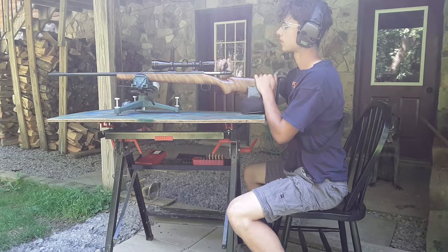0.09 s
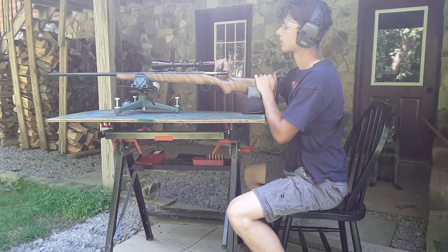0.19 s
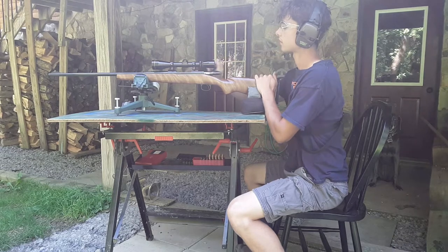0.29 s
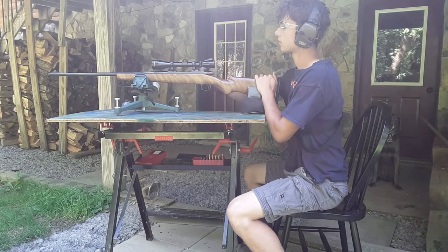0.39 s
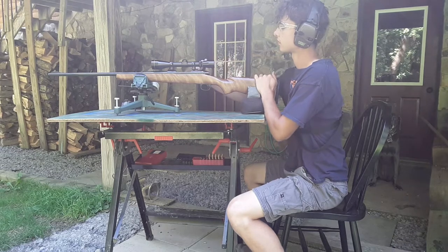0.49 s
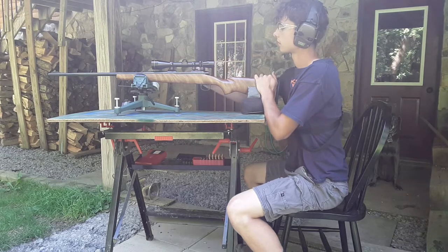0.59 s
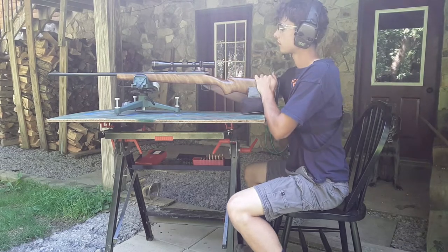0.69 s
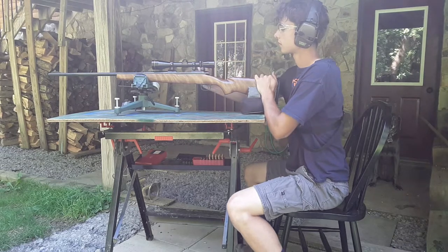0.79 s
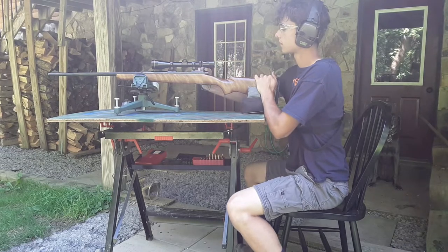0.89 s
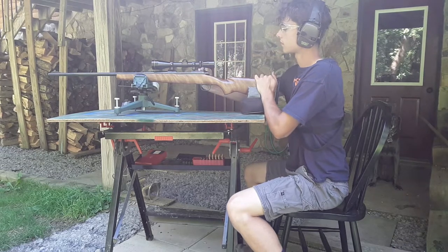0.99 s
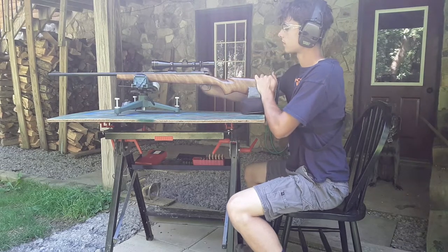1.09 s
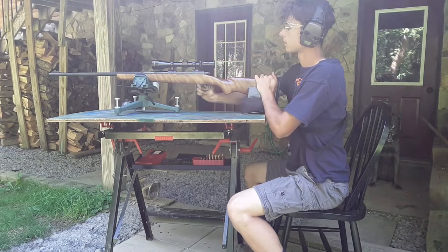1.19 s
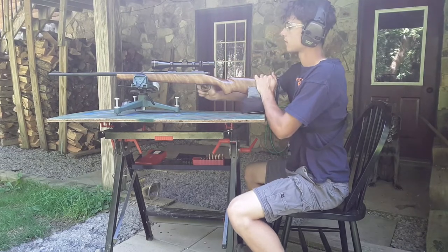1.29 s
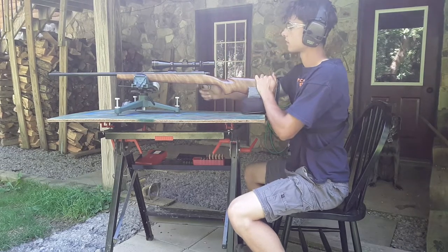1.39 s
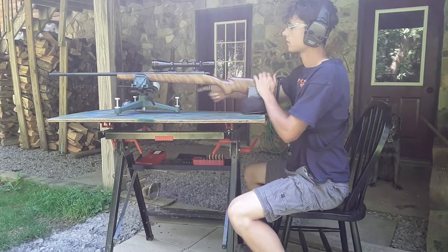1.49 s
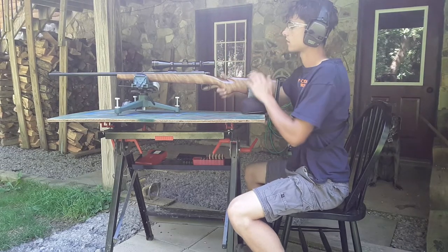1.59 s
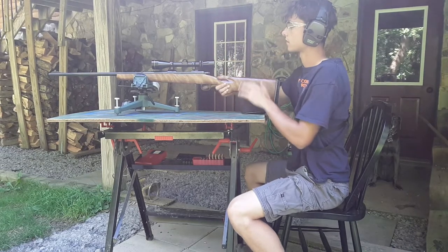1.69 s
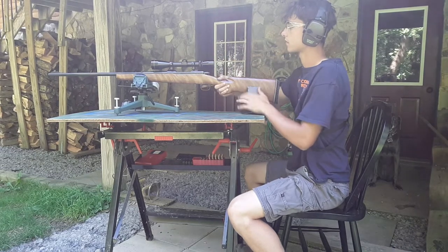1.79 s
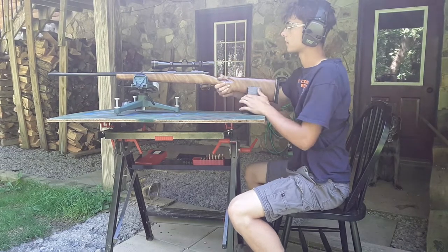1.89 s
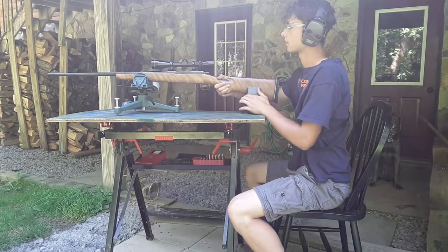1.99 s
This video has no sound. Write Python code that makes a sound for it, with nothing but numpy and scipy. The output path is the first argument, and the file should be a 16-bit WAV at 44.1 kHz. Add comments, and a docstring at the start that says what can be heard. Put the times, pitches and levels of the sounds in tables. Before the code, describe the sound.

A rifle bolt is worked close up: light steel clicks from 0.1 s, sharper ones at 0.2-0.27 s over a faint gritty slide, then a hard clack at 0.45 s. A light wooden tap follows at 0.6 s, then near quiet. Tiny ticks at 1.07-1.11 s lead to a loud snap shut at 1.15 s. Faint bumps follow; short stone-porch echo, soft outdoor hiss, low rumble.

```python
"""A rifle's bolt is worked at a shooting bench under an open stone porch: steel slides and clicks,
clacks against its stop, and after a few small ticks the action snaps shut.
Each contact is a noise burst exciting damped modes; sliding is randomly modulated noise, heard with dull bumps.
Decaying noise forms the brief porch echo and a faint yard tail.
Behind lie a soft high hiss, a low outdoor rumble and a faint far hum."""
import sys
import numpy as np
from scipy import signal
from scipy.fft import rfft, irfft
from scipy.io import wavfile
from scipy.ndimage import uniform_filter1d

SR = 44100
rng = np.random.default_rng(int(sys.argv[2]) if len(sys.argv) > 2 else 0)


def master(y):
    """Save y as 16-bit WAV."""
    cut = np.clip(np.atleast_2d(y).T, -1, 1)
    pcm = np.round(cut * 32767)  # scale
    wavfile.write(sys.argv[1], SR, pcm.astype(np.int16))


N = 88200
TIME = np.arange(N) / SR  # s
HZ = np.maximum(np.fft.rfftfreq(2 * N, 1 / SR), 1)
SIDES = np.array([[1], [-1]])  # left, right

# Contacts: start_s, level_db (before the part's gain), bass_db, treble_db, decay_ms, ring_hz
# light contacts of the bolt
CLICK_CONTACTS = [(.0945, -25, -2, -24, 1.9, 6430), (.1805, -14.5, 1, -31, 5.6, 5450),
                  (.2132, -5, -34, 4.5, 2.2, 5120), (.2172, -12.5, 0, 8, 5.2, 7440),
                  (.2662, -9.5, -3, 1, 2.6, 7700), (.2712, -10.5, -3, -2, 13, 5450),
                  (.3815, -28, 8, 4.5, 6.5, 6440), (.391, -27, 16.5, 0.5, 3.7, 10700),
                  (.4338, -12.5, -4.5, 2, 0.85, 6700), (.4422, -18, 9, -1, 1.3, 1670),
                  (.7824, -30.5, -5, -16, 3, 4280), (1.069, -29, -10, 9.5, 0.98, 8400),
                  (1.1003, -26.5, -3, 7, 2.1, 7220), (1.1138, -25.5, 9.5, -3, 2.3, 2920)]
# the bolt grazes its stop, hits it and rebounds
STOP_CONTACTS = [(.4501, -14.5, 2.5, -5, 1.08, 5370), (.4516, -6.5, 0, 0, 1.42, 6680),
                 (.4562, -19.5, -10, -6, 1, 6800)]
# the action snaps shut
SNAP_CONTACTS = [(1.1486, 0, 0.5, -3, 1.48, 740)]
# light knocks on the wooden stock
TAP_CONTACTS = [(.5958, -23, -1.5, -5, 2, 1380), (1.4545, -35.5, 0.5, -29, 1.3, 2220),
                (1.6425, -34.5, -7, 7, 3.5, 2590)]

# Broad spectrum of each struck part: frequency_hz, level_db (relative)
CLICK_SPECTRUM = [(250, -16.5), (650, -13), (1300, -5.5), (3000, -1.5), (5300, -1.5), (7800, -4.5),
                  (9000, -11.5), (11500, -16), (15500, -27.5)]
STOP_SPECTRUM = [(180, -15.5), (550, -26), (780, -2.5), (1150, -7), (1500, -5), (2600, 0), (4000, -0.5),
                 (6700, -3.5), (8300, -8), (12000, -16.5), (15500, -24)]
SNAP_SPECTRUM = [(170, -15), (290, -24.5), (470, -11.5), (640, -4), (820, 0.5), (1000, -11.5), (1250, -3),
                 (1850, 1.5), (2550, -10), (3100, -3.5), (5500, -3.5), (7000, -0.5), (8200, -6.5),
                 (12000, -13.5), (15500, -28)]
TAP_SPECTRUM = [(300, -8.5), (950, -8.5), (1350, -4), (2400, -4.5), (4500, -2), (7000, -6), (15000, -38)]

# Vibration modes of each part: frequency_hz, level_db (above the broad spectrum), t60_s
CLICK_RESONANCES = [(4590, 8, 0.04), (6900, 9.5, 0.023), (10980, 12, 0.025)]
STOP_RESONANCES = [(855, 4, 0.076), (1216, 5.3, 0.016), (1790, 9.7, 0.077), (3756, 5, 0.013),
                   (5240, 2.2, 0.03), (6840, 2.6, 0.032)]
SNAP_RESONANCES = [(666, 2.8, 0.052), (1210, 3.7, 0.024), (1290, 2.3, 0.056), (1730, 0.92, 0.027),
                   (1808, 4.2, 0.047), (2990, 8.4, 0.014), (4230, 3.5, 0.16), (5500, 3.6, 0.033),
                   (6450, 7.7, 0.006)]
TAP_RESONANCES = [(1890, 9.4, 0.01), (3280, 9, 0.0093)]
SLIDE_RESONANCES = [(1710, 12, 0.02), (3563, 8.2, 0.031)]

# Friction of the sliding bolt: time_s, level_db (before roughness, pan and resonance)
SLIDE_LEVEL = [(.085, -52), (.1, -46), (.17, -54.5), (.3, -44.5), (.36, -49.5), (.46, -44), (.62, -61),
               (.72, -61)]
# Friction spectrum: frequency_hz, level_db (relative)
SLIDE_SPECTRUM = [(200, -2), (700, -2), (1700, -3), (2600, 2.5), (3600, 6), (6500, 2), (9000, -35),
                  (15000, -64)]

# Hands shift the rifle on its rest: start_s, level_db, decay_s
REST_BUMPS = [(0.098, -44.5, 0.085), (.235, -57, 0.029), (0.454, -49, 0.09), (1.379, -50.5, 0.027),
              (1.618, -59, 0.022)]
# Bump spectrum: frequency_hz, level_db (relative)
BUMP_SPECTRUM = [(25, -11.5), (65, -3), (150, -2.5), (230, -5.5), (350, -40), (4000, -82)]

# Colour of the porch echo: frequency_hz, gain_db
ECHO_COLOUR = [(150, 6.5), (700, 1), (2500, 0), (15000, 3.5)]
# Left-right balance of the rifle: frequency_hz, left_minus_right_db
RIFLE_PAN = [(700, 0), (1100, -6.5), (2200, 5.5), (5000, 9.5), (8000, 12.5), (13000, 9.5)]
# Left-right likeness of rifle and echo: frequency_hz, correlation (limited to 0.98 either way)
RIFLE_LIKENESS = [(700, 0.88), (1500, 0.59), (3000, -0.23), (12000, -0.046)]

# Outdoor hiss spectrum: frequency_hz, level_db (relative)
HISS_SPECTRUM = [(100, -17), (300, -4), (520, -8.5), (950, -12), (1400, -10), (2000, -3.5), (4300, -3.5),
                 (6620, 0.5), (8500, -9.5), (12700, -19), (16000, -34)]
# Outdoor hiss level: time_s, level_db (before pan)
HISS_LEVEL = [(0, -51.5), (.7, -52.5), (1.0, -54), (1.4, -53.5), (1.7, -57), (2, -57.5)]
# Low rumble spectrum: frequency_hz, level_db (relative)
RUMBLE_SPECTRUM = [(20, -39), (42, 3), (75, 2), (150, -6), (260, -25), (700, -40), (3000, -80)]
# Far hum level: time_s, level_db (peak)
HUM_LEVEL = [(.6, -65), (.72, -68), (1.06, -70.5), (1.15, -65)]
# Left-right likeness of bumps, hiss and rumble: frequency_hz, correlation
OUTDOOR_LIKENESS = [(50, 0), (160, 0.77), (600, 0.45), (2000, 0)]

BASS_HZ, TREBLE_HZ = 1670, 7600  # corners of each contact's bass and treble shelves
RING_Q = 27  # sharpness of the ring that belongs to each point of contact
PORCH_T60_S, PORCH_DB, PORCH_BUILD_S = 0.088, -2.5, 0.003
WALL_DELAY_S, WALL_DB, WALL_DECAY_S = 0.017, -10, 0.02
YARD_T60_S, YARD_DB, YARD_LOW_CUT_HZ = 0.66, -24, 430
PORCH_PAN_SHARE = 0.51  # part of the rifle's pan that the echo keeps
HUM_HZ, RUMBLE_DB = 369, -62.5
CUTOFF_HZ = 16700


def bolt_clicks():
    """Light impact: brief steel contacts excite the bolt's damped modes."""
    return strikes(CLICK_CONTACTS, CLICK_SPECTRUM, CLICK_RESONANCES,
                   attack_s=0.00046, ring_db=8.5, gain_db=1.0)


def stop_clack():
    """Repeated impact: graze, blow and rebound excite the same modes in turn."""
    return strikes(STOP_CONTACTS, STOP_SPECTRUM, STOP_RESONANCES,
                   attack_s=0.00054, ring_db=10.5, gain_db=7.5)


def action_snap():
    """Hard impact: one very abrupt force excites the modes of the closing action."""
    return strikes(SNAP_CONTACTS, SNAP_SPECTRUM, SNAP_RESONANCES,
                   attack_s=0.000163, ring_db=-0.5, gain_db=5.5)


def stock_taps():
    """Soft impact: a slower force excites the short modes of the wooden stock."""
    return strikes(TAP_CONTACTS, TAP_SPECTRUM, TAP_RESONANCES,
                   attack_s=0.0012, ring_db=11, gain_db=5)


def strikes(contacts, spectrum, modes, attack_s, ring_db, gain_db):
    """Source and resonator: each contact force has its own ring and drives the modes of the whole part."""
    force = np.zeros((2, 2 * N))
    low_pass = signal.butter(1, BASS_HZ, fs=SR)
    high_pass = signal.butter(1, TREBLE_HZ, "high", fs=SR)
    for start_s, level_db, bass_db, treble_db, decay_ms, ring_hz in contacts:
        hit = crack(attack_s, decay_ms / 1000)
        hit = hit + (from_db(bass_db) - 1) * signal.lfilter(*low_pass, hit)
        hit = hit + (from_db(treble_db) - 1) * signal.lfilter(*high_pass, hit)
        ring = signal.lfilter(*signal.iirpeak(ring_hz, RING_Q, fs=SR), hit)
        hit = hit + from_db(ring_db) * ring
        start = int(start_s * SR)
        force[:, start:start + hit.shape[1]] += from_db(level_db + gain_db) * hit
    low_cut_db = 10 * np.log10(1 + (120 / HZ) ** 6)  # falls away below 120 Hz
    body_db = at_hz(spectrum) + resonances(modes) - low_cut_db
    mean_power_db = 10 * np.log10(np.mean(from_db(body_db) ** 2))
    return colour(force[:, :N], body_db - mean_power_db)


def crack(attack_s, decay_s, size=2048):
    """Broadband excitation: a pair of dying noise bursts, evened out in frequency."""
    shape = swell(0, attack_s, decay_s)[:size]
    burst = rng.standard_normal((2, size)) * shape
    # alternately flatten the spectrum and restore the decay
    for _ in range(4):
        spectrum = rfft(burst)
        burst = irfft(spectrum / (abs(spectrum) + 1e-12))
        local_power = np.abs(uniform_filter1d(burst ** 2, size=40))
        burst *= shape / np.sqrt(local_power + 1e-12)
    return unit(burst)


def slide(rough_db=3.0, catches_per_s=350, pan_db=4):
    """Dry friction: steel catches and lets go on steel, a random flutter with a faint resonant squeak."""
    catches = np.interp(TIME * catches_per_s, np.arange(N), rng.standard_normal(N))
    level_db = np.interp(TIME, *np.transpose(SLIDE_LEVEL), left=-np.inf, right=-np.inf)
    gain = from_db(level_db + rough_db * catches + SIDES * pan_db / 2)
    rub = noise(SLIDE_SPECTRUM, RIFLE_LIKENESS) * gain
    return colour(rub, resonances(SLIDE_RESONANCES))


def bumps(attack_s=0.015):
    """Damped soft contact: low noise swells and dies as the stock shifts on its rest."""
    envelope = sum(from_db(db) * swell(start_s, attack_s, decay_s)
                   for start_s, db, decay_s in REST_BUMPS)
    return noise(BUMP_SPECTRUM, OUTDOOR_LIKENESS) * envelope


def porch(rifle):
    """Reverberation: close bench and roof echoes, then stone walls, then a faint thin tail from the yard."""
    near = from_db(PORCH_DB) * unit(swell(0.00043, PORCH_BUILD_S, PORCH_T60_S / np.log(1000)))
    wall = from_db(WALL_DB) * unit(swell(WALL_DELAY_S, 1 / SR, WALL_DECAY_S))
    yard = from_db(YARD_DB) * unit(swell(WALL_DELAY_S, WALL_DELAY_S, YARD_T60_S / np.log(1000)))
    close_noise, far_noise = rng.standard_normal((2, 2, N))
    far_noise = signal.lfilter(*signal.butter(1, YARD_LOW_CUT_HZ, "high", fs=SR), far_noise)
    tail = close_noise * np.hypot(near, wall) + far_noise * yard
    echoes = even(stereo(tail, RIFLE_LIKENESS))
    reverberation = signal.fftconvolve(rifle[None], echoes, axes=1)[:, :N]
    pan_db = PORCH_PAN_SHARE * SIDES * at_hz(RIFLE_PAN) / 2
    return colour(reverberation, at_hz(ECHO_COLOUR) + pan_db)


def outdoors(pan_db=4.0):
    """Stationary noise and a tone: slowly fading hiss, low rumble, and a far hum that comes and goes."""
    hiss_db = np.interp(TIME, *np.transpose(HISS_LEVEL)) + SIDES * pan_db / 2
    hiss = noise(HISS_SPECTRUM, OUTDOOR_LIKENESS) * from_db(hiss_db)
    hum_db = np.interp(TIME, *np.transpose(HUM_LEVEL), left=-np.inf, right=-np.inf)
    hum = np.sin(2 * np.pi * HUM_HZ * TIME) * from_db(hum_db)
    rumble = from_db(RUMBLE_DB) * noise(RUMBLE_SPECTRUM, OUTDOOR_LIKENESS)
    return hiss + hum + rumble


def resonances(modes):
    """Damped resonance: the lift in dB that decaying modes give a spectrum, narrower for a longer t60."""
    power = 1
    for mode_hz, level_db, t60_s in modes:
        detuning = (HZ - mode_hz) * 2 * np.pi * t60_s / np.log(1000)
        power = power + from_db(level_db) ** 2 / (1 + detuning ** 2)
    return 10 * np.log10(power)


def swell(start_s, attack_s, decay_s):
    """Exponential relaxation: a quick rise and an exponential fall."""
    t = np.maximum(TIME - start_s, 0)
    return (1 - np.exp(-t / attack_s)) * np.exp(-t / decay_s)


def noise(spectrum, likeness):
    """Spectral shaping: coloured stereo noise with an rms of one."""
    pair = stereo(rng.standard_normal((2, N)), likeness)
    return unit(colour(pair, at_hz(spectrum))) * np.sqrt(N)


def stereo(pair, likeness):
    """Correlation by sum and difference: two unrelated signals become a left and right of given likeness."""
    alike = np.clip(at_hz(likeness), -.98, .98)
    middle = colour(pair[0], 10 * np.log10(1 + alike))
    side = colour(pair[1], 10 * np.log10(1 - alike))
    return middle + SIDES * side


def colour(x, gain_db):
    """Causal minimum-phase filtering: peaks ring on and nothing sounds early."""
    cepstrum = irfft(gain_db * np.log(10) / 20 + 0j)
    # fold the cepstrum onto positive time
    cepstrum[..., 1:N] *= 2
    cepstrum[..., N + 1:] = 0
    return irfft(rfft(x, 2 * N) * np.exp(rfft(cepstrum)))[..., :N]


def even(x, width_hz=120):
    """Spectral whitening: levels the broad humps and holes of a diffuse echo."""
    size = max(int(width_hz / HZ[2] * 2), 3)
    power = uniform_filter1d(abs(rfft(x, 2 * N)) ** 2, size=size, axis=-1)
    return colour(x, -10 * np.log10(power / power.mean() + 1e-9))


def at_hz(points):
    """Logarithmic frequency scale: interpolates a spectrum table onto the frequency grid."""
    hz, value = np.transpose(points)
    return np.interp(np.log(HZ), np.log(hz), value)


def unit(x):
    """Energy normalisation: scales to a mean energy of one per channel."""
    return x / np.sqrt(np.mean(np.sum(x ** 2, axis=-1)) + 1e-20)


def from_db(db):
    """Logarithmic level: converts decibels to an amplitude gain."""
    return 10 ** (np.asarray(db) / 20)


def scene():
    """Superposition: the rifle, its upper range to the left, with its porch and surroundings."""
    rifle = bolt_clicks() + stop_clack() + action_snap() + stock_taps()
    direct = colour(stereo(rifle, RIFLE_LIKENESS), SIDES * at_hz(RIFLE_PAN) / 2)
    return direct + slide() + bumps() + porch(rifle[0]) + outdoors()


def record(dry):
    """Amplitude and band limiting: peaks beyond full scale clip, then the top of the spectrum is cut."""
    low_pass = signal.cheby2(16, 60, CUTOFF_HZ, fs=SR, output="sos")
    return signal.sosfilt(low_pass, np.clip(dry, -1, 1))


dry = scene()
out = record(dry)
master(out)
```